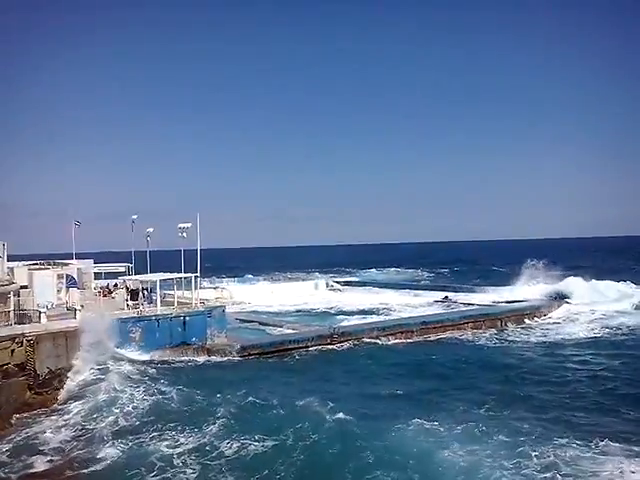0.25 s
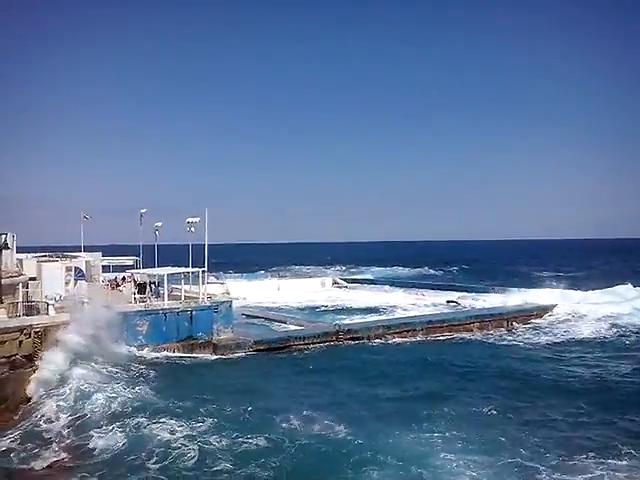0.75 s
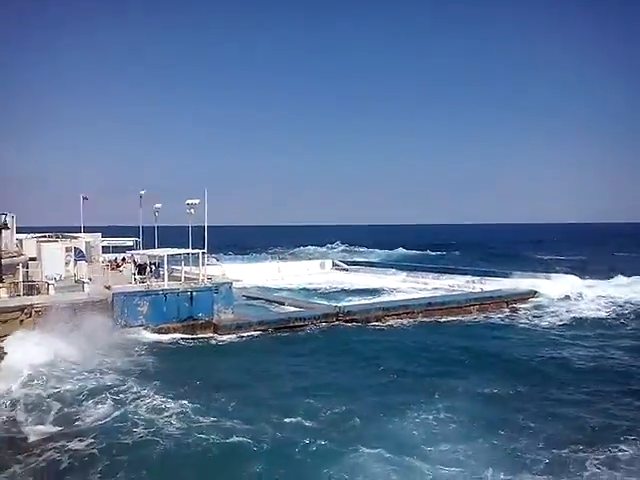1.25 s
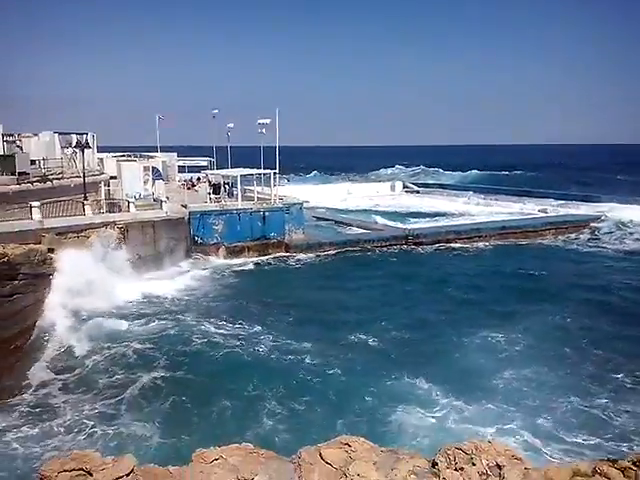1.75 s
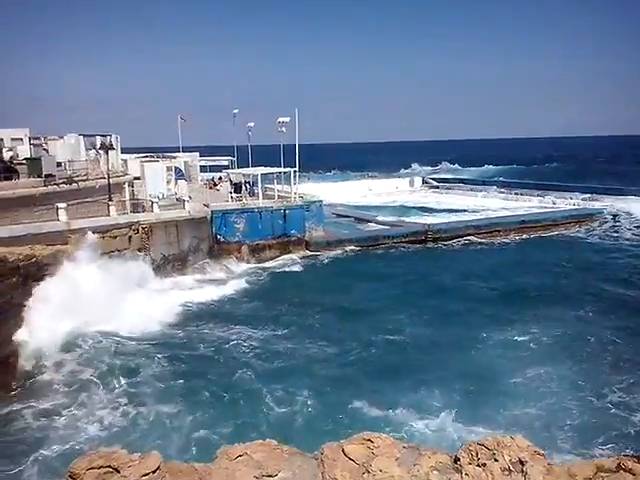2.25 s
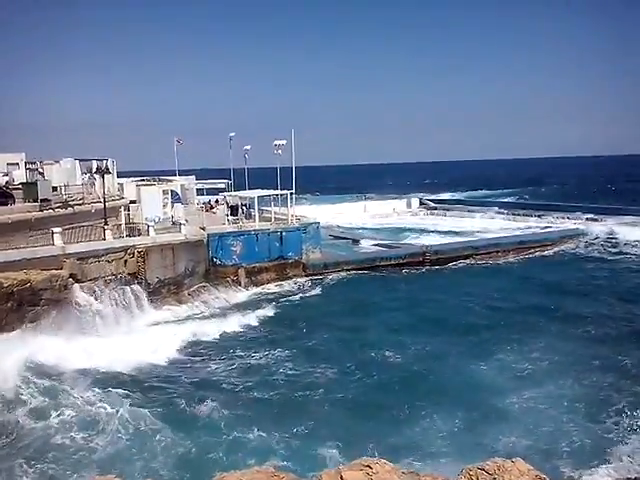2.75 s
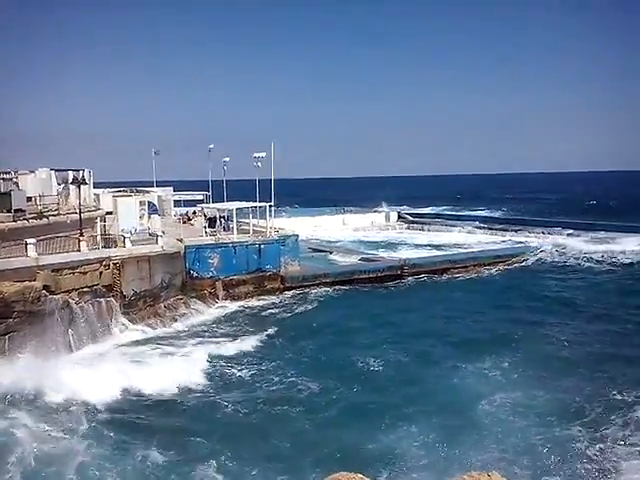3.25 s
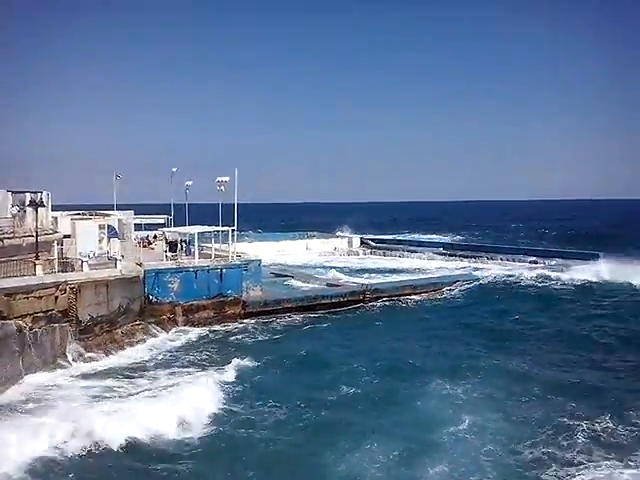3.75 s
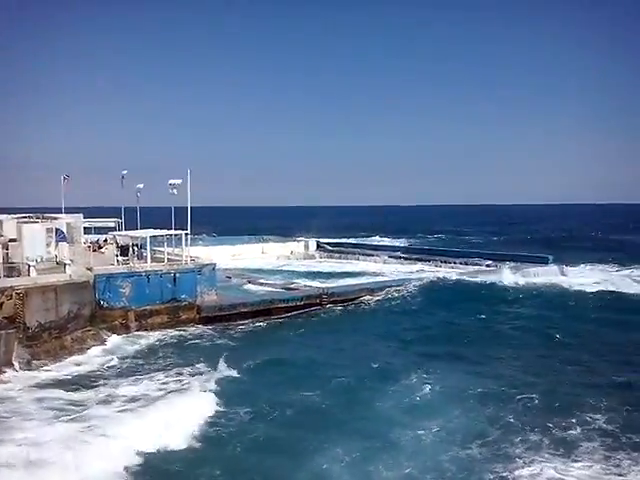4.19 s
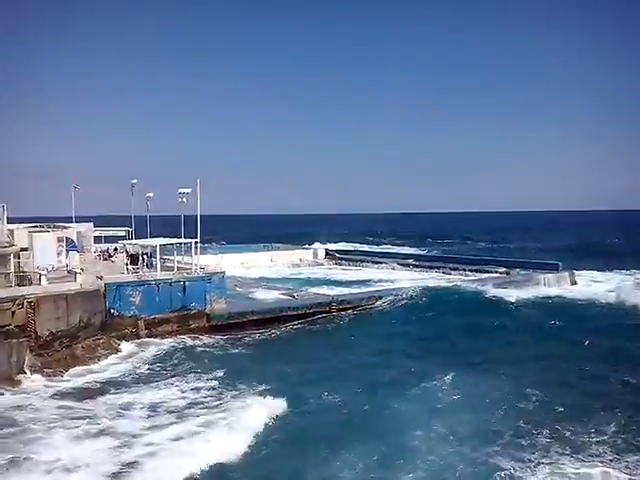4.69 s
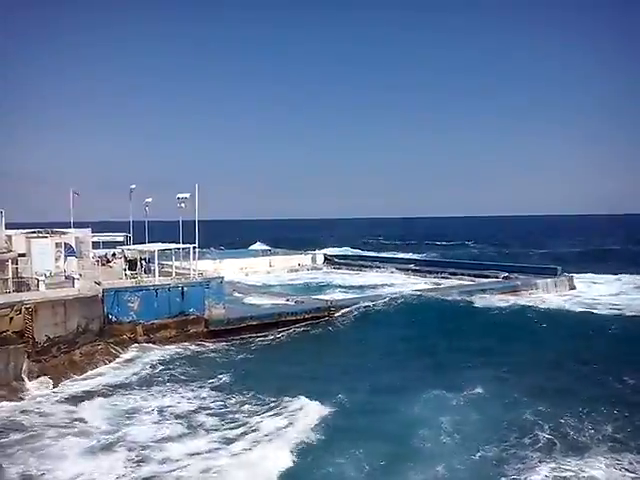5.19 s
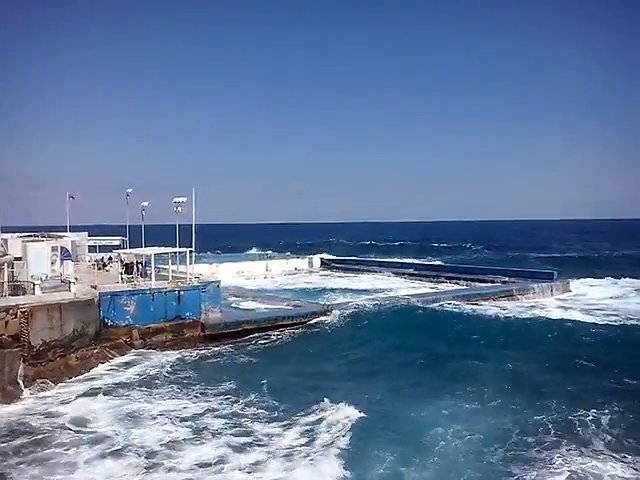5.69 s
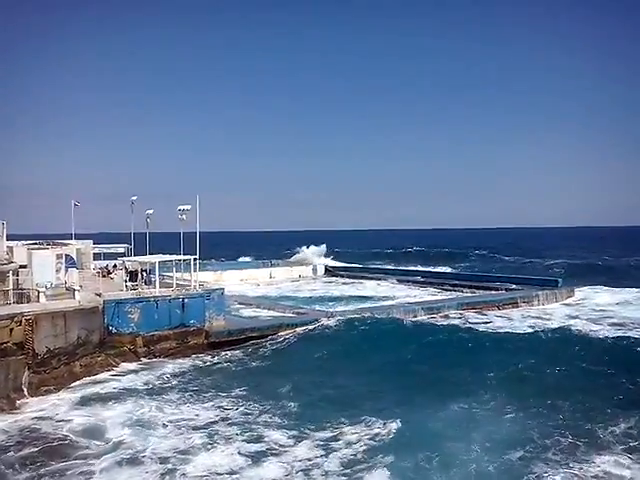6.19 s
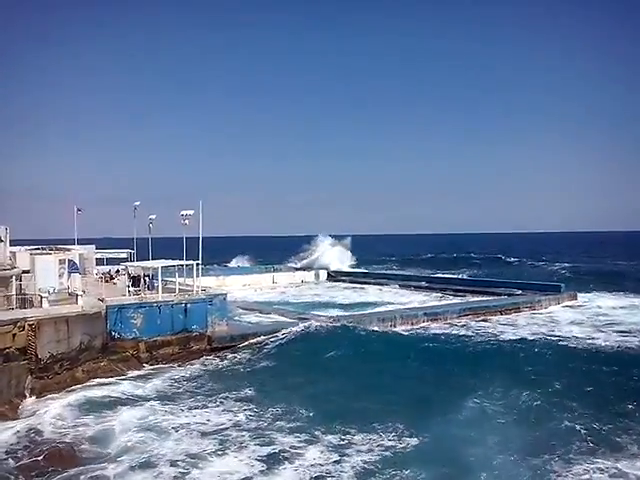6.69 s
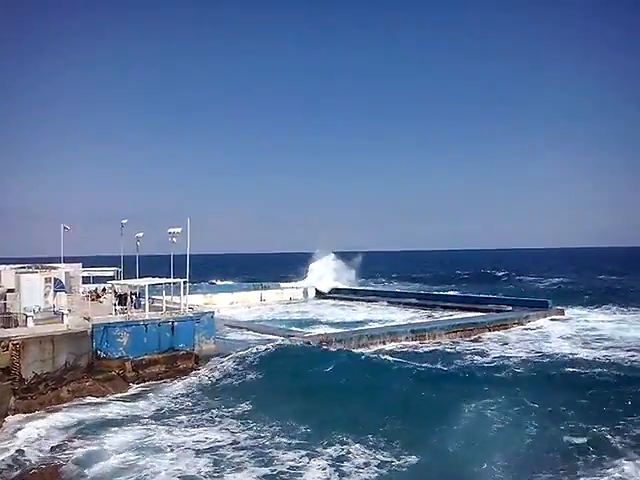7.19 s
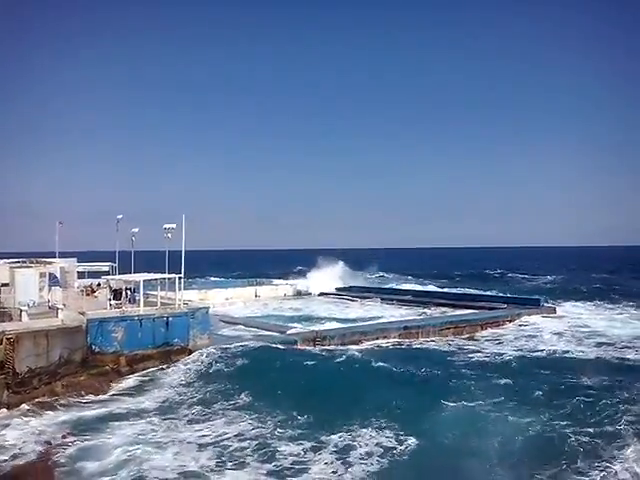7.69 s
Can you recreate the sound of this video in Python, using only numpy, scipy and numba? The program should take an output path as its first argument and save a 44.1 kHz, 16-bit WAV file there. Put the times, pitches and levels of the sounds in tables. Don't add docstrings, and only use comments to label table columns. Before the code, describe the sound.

Breaking waves roar steadily below a ledge, with fine bubbling foam and low, uneven wind buffeting. Around two seconds water smacks the concrete with a brief low thud, and the surge grows fuller, foam fizzing after three seconds. A louder, abrupt knock with a short splash comes at four and a half. Wind puffs peak after six seconds, then surf runs on. Open air, cheap handheld mono microphone, clipped peaks, dull top.

```python
import sys
import numpy as np
from scipy import signal
from scipy.fft import rfft, irfft
from scipy.io import wavfile
from scipy.ndimage import uniform_filter1d
from numba import njit

SR = 44100
rng = np.random.default_rng(int(sys.argv[2]) if len(sys.argv) > 2 else 0)


def transcribe(u):
    v = np.clip(np.atleast_2d(u).T, -1, 1)
    q = np.round(v * 32767).astype(np.int16)
    wavfile.write(sys.argv[1], SR, q)


def decibels_to_gain(level_db):
    exponent = np.asarray(level_db, float) / 20
    return 10 ** exponent


N = 350154
FREQ = np.fft.rfftfreq(N, 1 / SR) + 1e-3

# frequency in Hz, density in dB per Hz.
RUMBLE_SPECTRUM = [(15, -63.5), (25, -28), (56, -4.5), (91, 2), (160, 0.5), (186, -1.5), (374, -3),
                   (568, 6.5), (700, -17), (910, -47), (1540, -120)]
# centre in seconds, peak level in dB, length at half power in seconds.
GUSTS = [(0.651, -20, 0.1), (0.8, -27, 0.22), (1.224, -24.5, 0.13), (1.45, -26.5, .3),
         (1.765, -19.5, 0.054), (1.9, -28, .25), (2.177, -19, 0.26), (2.548, -21, 0.44), (3.042, -29, 0.11),
         (4.019, -24.5, 0.11), (4.15, -27, 0.27), (4.843, -26, 0.45), (5.76, -25.5, .3),
         (6.377, -21.5, 0.27), (6.934, -28.5, 0.25), (7.3, -30, .4), (7.9, -26, 0.17)]
# peak time in seconds, peak level in dB, pitch in Hz.
PUFFS = [(0.173, -14.5, 183), (0.617, -14, 104), (0.666, -15, 140.5), (1.18, -14.5, 117),
         (1.243, -10, 85.4), (1.321, -14.5, 161), (1.759, -10, 201), (1.786, -12.5, 174),
         (1.99, -12.5, 213), (2.112, -8, 108.7), (2.252, -10, 116), (2.306, -11, 165), (2.674, -14, 141),
         (2.74, -11, 162), (4.029, -10.5, 188), (4.178, -14.5, 89), (4.206, -9, 114.3),
         (4.691, -14.5, 144.5), (4.859, -15, 98), (4.929, -10, 232), (5.286, -13, 109),
         (5.709, -14.5, 116.6), (5.835, -12, 123), (6.181, -13.5, 135), (6.271, -9, 146),
         (6.322, -10.5, 166), (6.35, -6, 114), (6.428, -9.5, 226), (6.496, -13, 131.5), (7.258, -14.5, 129)]
EDDIES = np.array([(.62, 0.4), (1, 0.8), (1.55, 0.39), (2.3, 0.24), (3.3, 0.1)])
# frequency in Hz, density in dB per Hz.
WATER_SPECTRUM = [(260, -6.5), (450, -5), (628, -9.5), (951, -8), (1530, -7.5), (1850, -1.5), (1940, -2.5),
                  (2190, -8.5), (2710, -16.5), (3470, -18.5), (4350, -13), (5020, -14.5), (6520, -13.5),
                  (7090, -18.5), (7700, -38.5), (10000, -57.5), (16900, -120)]
# time in seconds, surge level in dB, fine foam in dB over the surge.
SURF_SWELL = [(0.0, -26, -16), (0.35, -24.5, -17.5), (1.08, -26, -17), (1.56, -24, -15), (2.08, -23, -17),
              (2.11, -19, -14.5), (2.61, -20, -14), (2.85, -22, -14), (3.32, -23.5, -7.5),
              (3.65, -22.5, -12), (4.1, -22, -14.5), (4.3, -25.5, -13.5), (4.55, -22.5, -15),
              (4.92, -23.5, -13.5), (6.2, -23.5, -13.5), (6.5, -25.5, -16), (6.95, -24.5, -16.5),
              (7.94, -24, -19.5)]
# frequency in Hz, density in dB per Hz.
SPLASH_SPECTRUM = [(260, -26.5), (450, -6.5), (697, -16.5), (823, -10.5), (1260, -8.5), (1970, 0.5),
                   (2750, -29.5), (4410, -15.5), (5390, -22), (6910, -19.5), (7600, -41), (9880, -62),
                   (16700, -120)]
# start in seconds, rms level in dB, 60 dB decay time in seconds, brightness in dB.
SLAPS = [(2.101, -14.5, 0.18, 10.5), (2.108, -18.5, .06, 6), (2.119, -15.5, 0.11, 8),
         (2.24, -22.5, 0.18, 22), (2.488, -19, 0.34, 6), (2.67, -18.5, 0.52, -3), (2.88, -16.5, .15, -4),
         (3.109, -23, 0.29, 1), (4.2, -18.5, 0.61, 3.5), (4.512, -17, 0.26, -0.5), (4.542, -4, 0.11, -1),
         (4.557, -10, 0.08, -1.5), (4.578, -14.5, 0.11, 4.5), (4.582, -33, 0.36, 36), (4.587, -13, 0.21, 4),
         (4.6, -16, 0.56, 4), (4.674, -27, 0.16, 1), (6.826, -24.5, 0.3, 1)]
# start in seconds, peak level in dB, pitch in Hz.
THUDS = [(1.723, -16.5, 110.5), (2.1032, -6, 260), (2.1086, -2, 154.5), (2.123, -15, 186),
         (2.491, -11, 278), (2.669, -9.5, 270), (2.88, -17, 303), (4.002, -10, 640), (4.002, -15.5, 163),
         (4.02, -19.5, 224), (4.035, -16.5, 72.7), (4.543, -1, 358), (4.558, -4.5, 396), (4.58, -14, 97),
         (4.589, -9, 330), (4.931, -9.5, 102.4)]
# time in seconds, share from 0 to 1.
FACING = [
    (0, 0),
    (2, 0),
    (3.5, 0),
    (3.9, 0.7),
    (6.25, .9),
    (6.6, .3),
    (7.94, 0.2),
]
# frequency in Hz, gain in dB.
HEAD_ON_RINGS = [
    (2200, 0),
    (3100, -3),
    (3900, 1),
    (4450, 4),
    (4900, -2),
    (5700, -3.5),
    (6500, 0),
    (7500, 2.5),
]


def unit(x):
    return x / np.sqrt(np.mean(x ** 2))


def colour(x, table):
    hz, db = np.transpose(table)
    gain = decibels_to_gain(np.interp(np.log(FREQ), np.log(hz), db))
    return irfft(rfft(x) * gain, N)


def walk(rate):
    hold = int(SR / rate)
    levels = np.repeat(rng.standard_normal(N // hold + 1), hold)
    smooth = uniform_filter1d(uniform_filter1d(levels, hold), hold)[:N]
    return smooth / smooth.std()


def patchy(x, lo_hz, hi_hz, shared_db, own_db, rate):
    spectrum, out, shared = rfft(x), 0, walk(rate)
    for octave in np.arange(np.log2(lo_hz), np.log2(hi_hz), .5):
        window = np.cos(np.pi * np.clip(np.log2(FREQ) - octave, -.5, .5)) ** 2
        flicker = decibels_to_gain(shared_db * shared + own_db * walk(rate))
        out = out + flicker * irfft(spectrum * window, N)
    return unit(out)


@njit
def ring(start, hz, cycles, size, glide):
    out = np.zeros(N)
    for g in range(len(start)):
        fade = hz[g] / SR / cycles[g]
        phase = 0.
        for i in range(min(int(5 / fade), N - start[g])):
            phase += 2 * np.pi * hz[g] / SR * (1 + glide * i * fade)
            out[start[g] + i] += size[g] * np.exp(-i * fade) * np.sin(phase)
    return out


def bubbles(count, lo_hz, hi_hz, cycles, spread_db):
    when, pitch, luck = rng.random((count, 3)).T
    start = (when * N).astype(np.int64)
    hz = lo_hz + (hi_hz - lo_hz) * pitch
    loudness_db = -spread_db * np.log(1 - .97 * luck)
    size = decibels_to_gain(loudness_db) * np.sqrt(hz)
    return unit(ring(start, hz, np.full(count, 1. * cycles), size, 0.064))


def gusts():
    t = np.arange(N) / SR
    power = decibels_to_gain(-26) ** 2
    for s, db, length in GUSTS:
        power = power + decibels_to_gain(db) ** 2 * np.exp(-np.log(2) * (2 * (t - s) / length) ** 2)
    return 10 * np.log10(power)


def wind(wind_db):
    eddies = bubbles(count=900, lo_hz=50.4, hi_hz=472, cycles=0.53, spread_db=3.0)
    air = colour(rng.standard_normal(N) + decibels_to_gain(-19) * eddies, RUMBLE_SPECTRUM)
    rumble = patchy(air, 500 / 2 ** 4.5, 490, shared_db=.5, own_db=0.0, rate=9.1)
    return decibels_to_gain(wind_db + 1.0) * rumble


def puffs():
    t, out, calm = np.arange(N) / SR, np.zeros(N), np.ones(N)
    ratio, strength = np.transpose(EDDIES)
    swings = 2.2
    for (s, db, hz), turn in zip(PUFFS, rng.random((len(PUFFS), len(EDDIES)))):
        near = slice(max(int((s - .1) * SR), 0), int((s + .1) * SR))
        age = t[near] - s
        cycles = np.outer(ratio * hz, age) + turn[:, None]
        swing = strength @ np.cos(2 * np.pi * cycles)
        stretch = np.where(age < 0, .7, 1.5)
        shape = np.exp(-np.log(2) * (2 * age * hz / swings / stretch) ** 2)
        out[near] += decibels_to_gain(db) * shape * swing
        calm[near] *= 1 - .5 * np.sqrt(shape)
    return out, calm


def surf(roar_db, spray_db, fizz_db):
    bursts = bubbles(count=12000, lo_hz=383, hi_hz=8290, cycles=1.77, spread_db=1.5)
    wash = rng.standard_normal(N) + decibels_to_gain(-10.0) * bursts
    water = colour(wash, WATER_SPECTRUM)
    roar = patchy(water, 481.5, 2500, shared_db=0.73, own_db=0.04, rate=12)
    spray = patchy(water, 500 * 2 ** 2.5, 4500, shared_db=.7, own_db=.6, rate=9)
    fizz = patchy(water, 500 * 2 ** 3.5, 9000, shared_db=.6, own_db=.4, rate=11)
    return decibels_to_gain(roar_db + 0.27) * roar + decibels_to_gain(spray_db - 0.8) * spray + decibels_to_gain(fizz_db + 0.96) * fizz


def splashes():
    out = np.zeros(N)
    dull = unit(colour(rng.standard_normal(N), SPLASH_SPECTRUM))
    bright = unit(np.gradient(np.gradient(dull)))
    for s, db, t60, bright_db in SLAPS:
        near = np.arange(int(s * SR) + 1, min(int((s + 1) * SR), N))
        age = near / SR - s
        front = 1 - np.exp(-age * decibels_to_gain(db) / 0.0002)
        decay = np.exp(-np.log(1000) * age / t60)
        noise = dull[near] + decibels_to_gain(bright_db - 22.5) * bright[near]
        out[near] += front * decibels_to_gain(db) * decay * noise
    return out


def thuds():
    out = np.zeros(N)
    swings = 2.1
    for s, db, hz in THUDS:
        near = np.arange(int(s * SR) + 1, int((s + .5) * SR))
        age = near / SR - s
        out[near] += decibels_to_gain(db) * np.exp(-age * hz / swings) * np.sin(2 * np.pi * hz * age)
    return out


def scene():
    t = np.arange(N) / SR
    s, surge, foam = np.transpose(SURF_SWELL)
    surge_db, foam_db = np.interp(t, s, surge), np.interp(t, s, foam)
    pushes, calm = puffs()
    spray_db = surge_db - 5.5 + .35 * foam_db
    water = surf(surge_db, spray_db, surge_db + foam_db) + splashes() + thuds()
    facing = np.interp(t, *np.transpose(FACING))
    water = water + facing * (colour(water, HEAD_ON_RINGS) - water)
    return (water + calm * wind(gusts()) + pushes)[None]


def top_cut(x):
    return signal.sosfilt(signal.butter(12, 15800, fs=SR, output="sos"), x)


def record(dry):
    rate_hz, clip = 16000, .715
    port = colour(dry[0], [(15, -18.5), (35, -8.0), (60, -1.0), (9000, 0)])
    limited = np.clip(port, -clip, clip)
    kept = colour(limited, [(7100, 0), (7600, -1.0), (7900, -13.0), (8000, -21.5), (8100, -120)])
    mirror = 2 * kept * np.cos(2 * np.pi * rate_hz * np.arange(N) / SR)
    leak = colour(mirror, [(7990, -120), (8010, -1), (8300, -9.0), (8700, -21.5), (9150, -45.5), (9260, -120)])
    mix = np.clip(kept + leak, -clip, clip)[None]
    return top_cut(mix)


dry = scene()
out = record(dry)
transcribe(out)
```